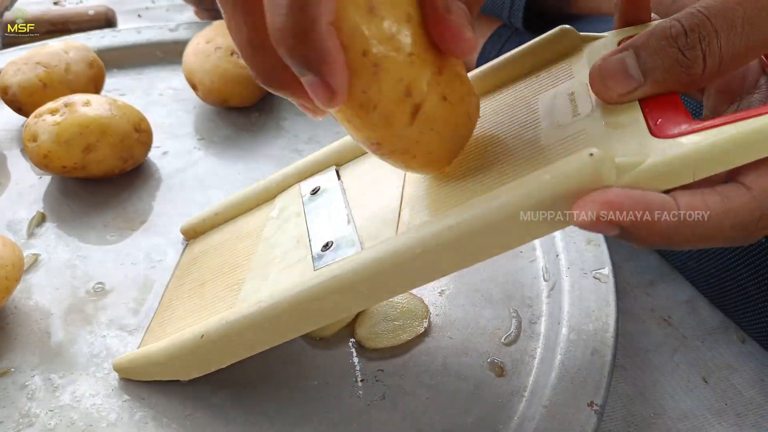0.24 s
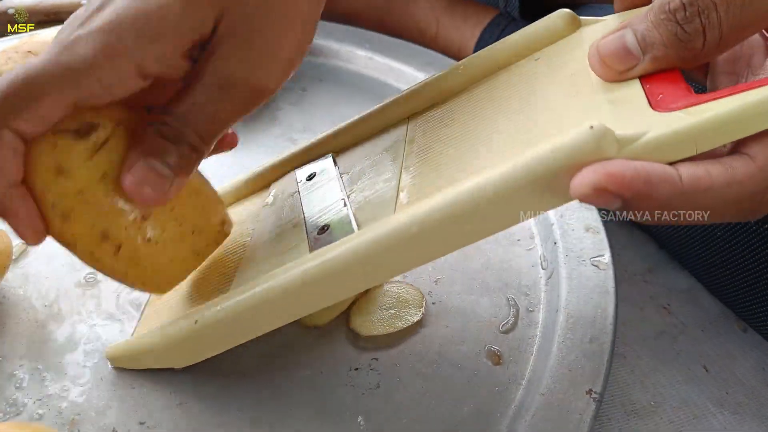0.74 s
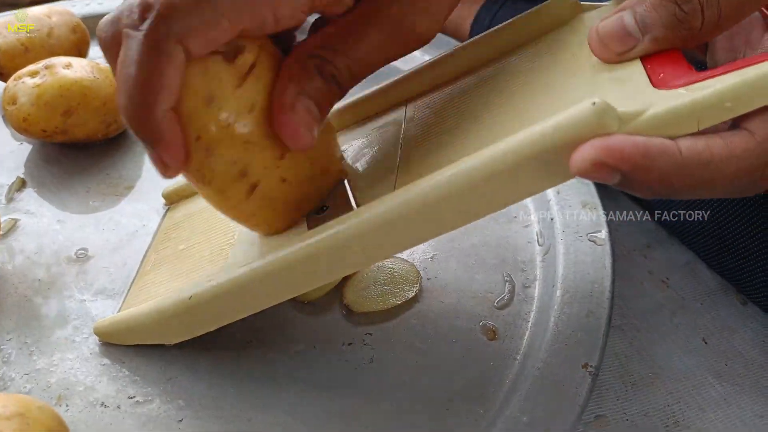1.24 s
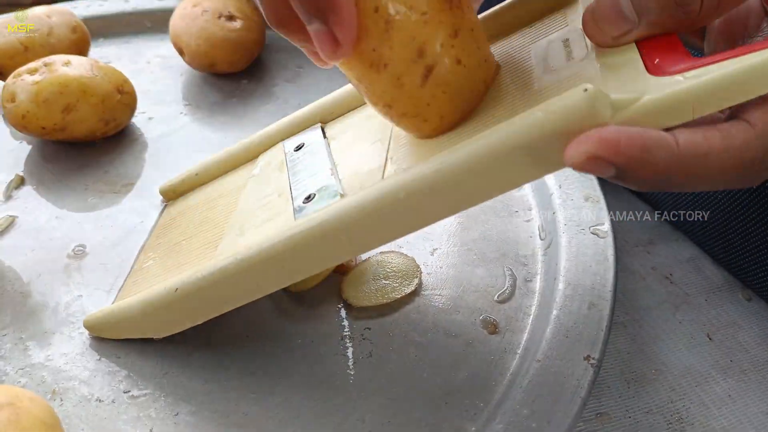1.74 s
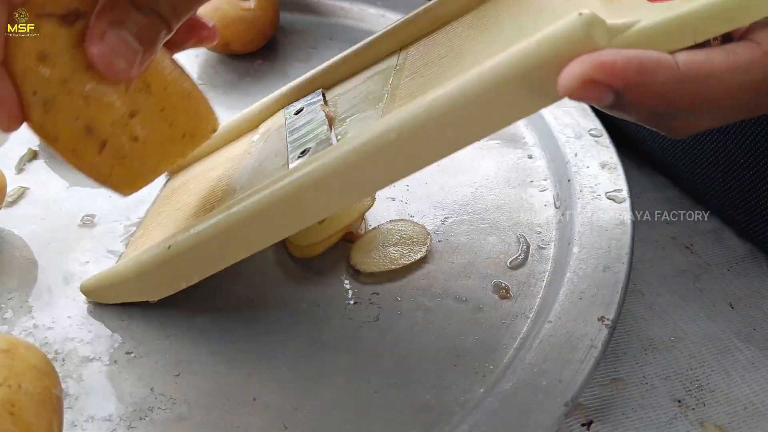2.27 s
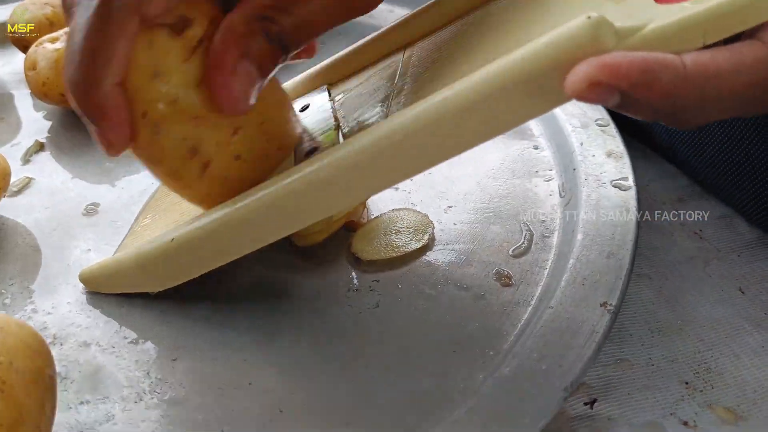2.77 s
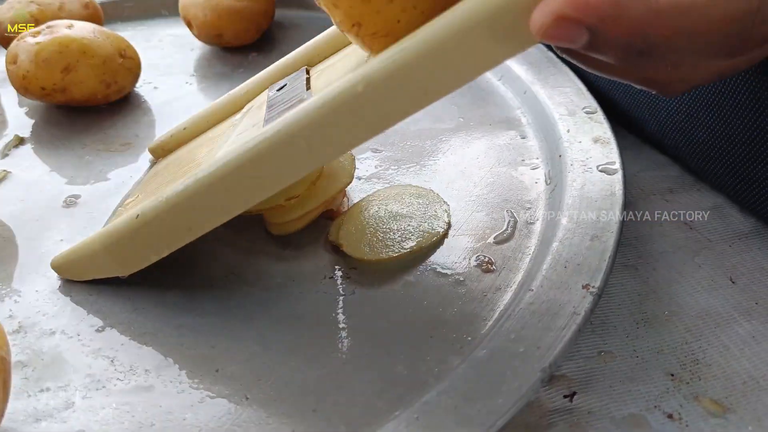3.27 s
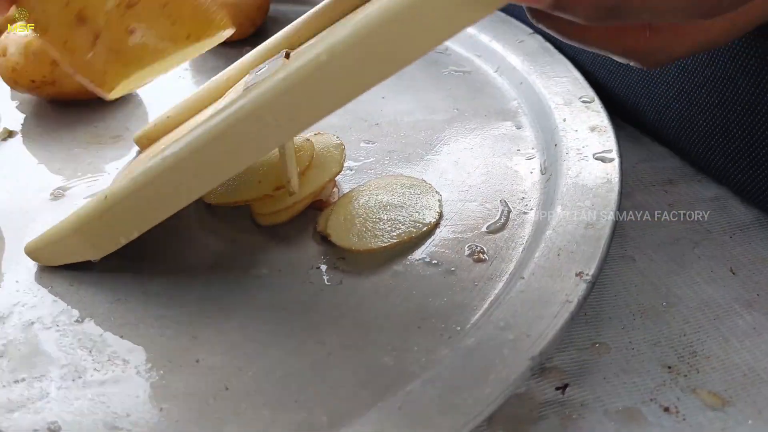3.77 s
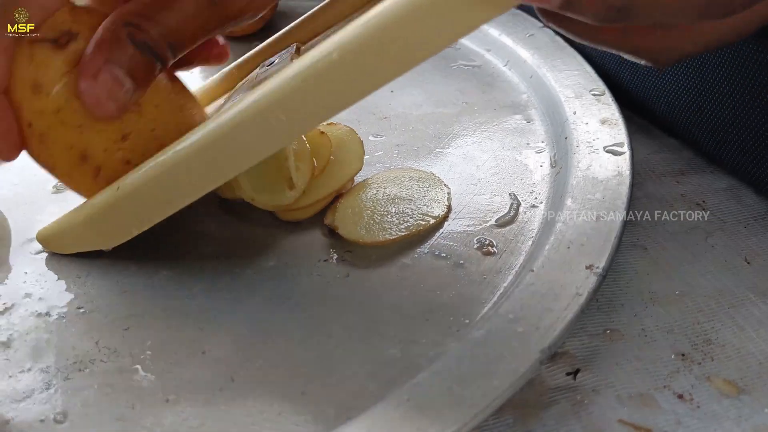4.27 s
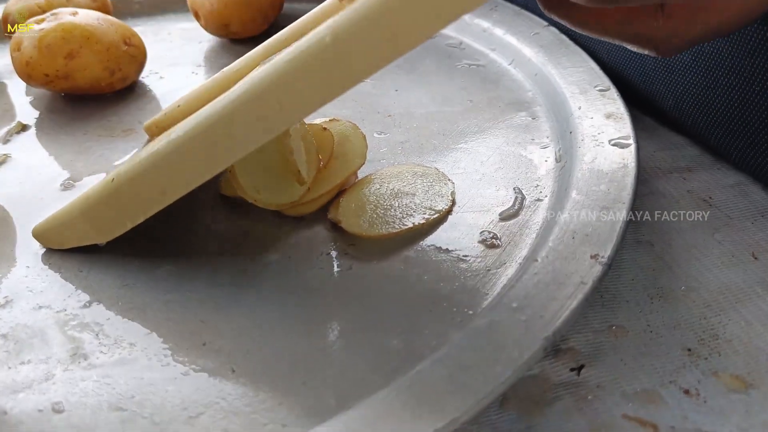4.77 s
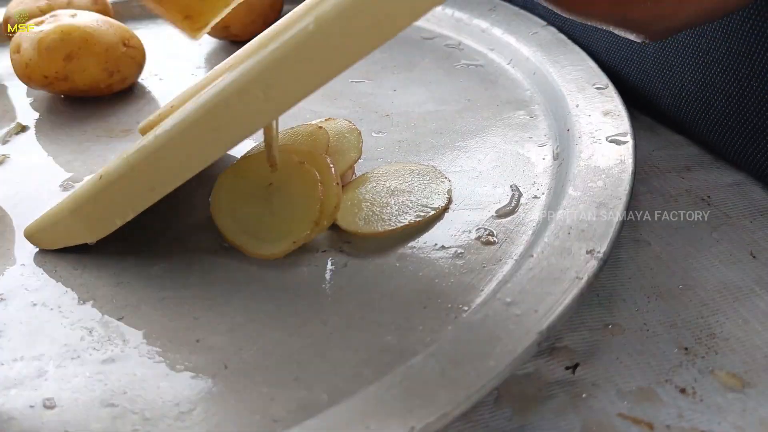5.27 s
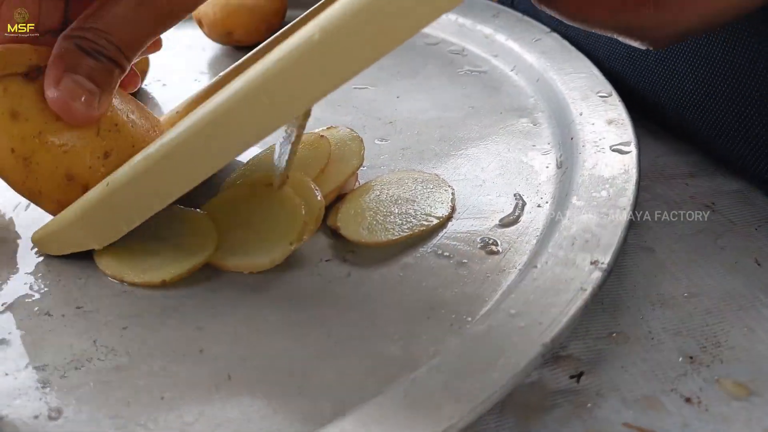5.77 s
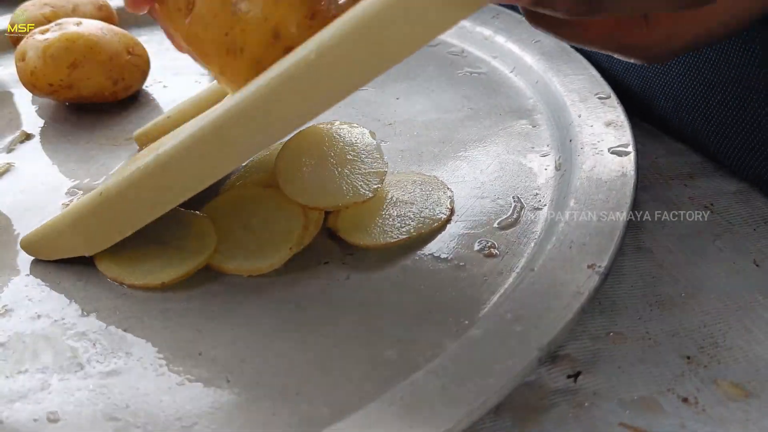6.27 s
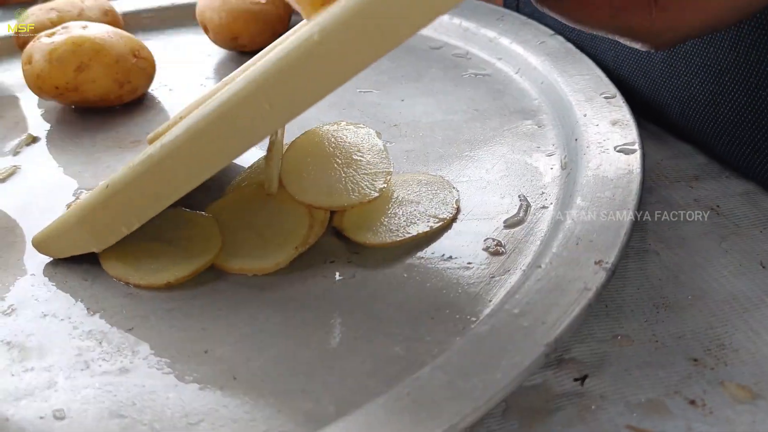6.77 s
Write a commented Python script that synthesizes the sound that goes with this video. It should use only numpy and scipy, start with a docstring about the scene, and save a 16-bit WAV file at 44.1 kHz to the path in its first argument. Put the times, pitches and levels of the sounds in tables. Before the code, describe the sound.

A close stereo view of potato slicing in a small, fairly dry kitchen, over quiet low rumble and soft hiss. A short scuff and light clack start at 0 s, with smaller drags following. Nine strokes bite the blade at about 0.6, 1.3, 2.1, 2.8, 3.5, 4.3, 5.0, 5.7 and 6.4 s. Each speeds up with a wet rubbing swish, knocks the blade, rips through in a crisp, juicy rasp of roughly 0.1 s, and ends with a small flick. Hollow plastic clacks fall between, notably sharp near 2.1 and 2.3 s, and busier from 4.1 to 5.2 s. Soft dull bumps mark returns to the top. A low draught flutters on the left around 1.5-1.9, 2.7-2.9, 5.0-5.4 s and intermittently from 5.9 s. Very faint squeaks and metallic tray ringing lie underneath; the last bumps are weak near 7 s.

```python
"""Kitchen hiss and a short scuff open the scene, then a raw potato is pushed nine times down a plastic mandoline.
Each stroke rubs over the wet ramp (stick-slip noise), bumps the blade, rasps through it (bursting cells)
and clacks off the end (noise pushes that ring the damped modes of the frame).
A draught, made of low turbulent noise, buffets the left microphone port.
The metal tray under the mandoline rings faintly, and a small room adds scattered echoes."""
import sys
import numpy as np
from scipy import signal
from scipy.fft import rfft, irfft, next_fast_len
from scipy.io import wavfile
from scipy.ndimage import uniform_filter1d, map_coordinates

SR = 44100
rng = np.random.default_rng(int(sys.argv[2]) if len(sys.argv) > 2 else 0)


def put_to_file(sound):
    """Save the sound as 16-bit audio at rate SR, in the file named by the first command-line argument."""
    columns = np.atleast_2d(sound).T  # one column per channel
    safe = np.clip(columns, -1, 1)
    whole_steps = np.round(safe * 32767)
    wavfile.write(sys.argv[1], SR, whole_steps.astype(np.int16))


N = 309582
TIME = np.arange(N) / SR


def amp(db):
    """Logarithmic level: decibels to gain."""
    return 10 ** (np.asarray(db) / 20)


def unit(x):
    """Power normalisation: scales to an rms of one."""
    return x / np.sqrt(np.mean(x ** 2) + 1e-20)


def read(points, hz):
    """Interpolates a curve over a log-frequency axis."""
    f, value = np.transpose(points)
    return np.interp(np.log(hz + 1), np.log(f + 1), value)


def level(rows, axis):
    """Envelope: one dB column of a time table as a gain for every sample."""
    rows = np.asarray(rows)
    return amp(np.interp(TIME, rows[:, 0], rows[:, axis]))


def add(mix, s, sound):
    """Superposition: mixes a sound in at time s, cut where the mix ends."""
    part = mix[:, round(s * SR):][:, :sound.shape[1]]
    part += sound[:, :part.shape[1]]


def convolve(x, response):
    """Linear filtering of each channel by an impulse response, keeping its length."""
    method = signal.oaconvolve if x.shape[1] == N else signal.fftconvolve
    return method(x, np.atleast_2d(response), axes=1)[:, :x.shape[1]]


def colour(x, spectrum, size=4096):
    """Minimum-phase filter: the Hilbert transform of the log gain supplies a causal phase."""
    hz = abs(np.fft.fftfreq(size, 1 / SR))
    log_gain = np.log(amp(np.maximum(read(spectrum, hz), -100)))
    response = np.fft.ifft(np.exp(np.conj(signal.hilbert(log_gain)))).real
    return convolve(x, response[:size // 2])


def band(low_hz, high_hz):
    """Causal Butterworth band-pass, as second-order sections."""
    return signal.butter(3, [low_hz, high_hz], "band", fs=SR, output="sos")


# Likeness of the two microphone ports: pitch_hz, likeness (0-1, negatives read as 0)
LIKENESS = [(610, 1), (900, 0.27), (1600, 0.78), (3000, 0), (8500, 0), (15000, -0.2)]
# Delay of the right port behind the left: pitch_hz, delay_s
LEAD = [(100, 0), (400, .00008), (700, .00005), (900, .00012), (1100, .00009), (1250, .00034),
        (1800, .00028), (2300, .00036), (3000, .00034), (4500, .000385)]
# Level difference of the ports: pitch_hz, left_minus_right_db
PAN = [(150, -1), (400, 4), (700, 1), (1200, 2.5), (2500, 0), (5000, -2.5), (9000, 3.5), (14000, -1)]


def ports(pair):
    """Interaural coherence: two unrelated signals become alike in the bass, shifted and unlike higher up."""
    size = next_fast_len(pair.shape[1])
    a, b = rfft(pair, size)
    hz = np.fft.rfftfreq(size, 1 / SR)
    same = np.clip(read(LIKENESS, hz), 0, 1)
    lean = amp(read(PAN, hz) / 2)
    delay = np.exp(-2j * np.pi * hz * read(LEAD, hz))
    right = (same * a + np.sqrt(1 - same ** 2) * b) * delay
    return irfft(np.array([a * lean, right / lean]), size)[:, :pair.shape[1]]


def ring(modes, seconds, stretch=1):
    """Modal synthesis: the impulse response is a sum of exponentially damped cosines."""
    t = np.arange(int(seconds * SR), dtype=np.float32) / SR
    response = 0
    for hz, db, t60 in modes:
        decay = np.exp(-float(np.log(1000) / t60) * t)
        response = response + float(amp(db)) * decay * np.cos(float(2 * np.pi * hz * stretch) * t)
    return response


# Modes of the plastic frame and its blade: pitch_hz (before the grip factor), level_db (relative), t60_s
FRAME = [(166, 2, 0.047), (248.7, -3, 0.044), (679, -25.5, 0.018), (405, 0.5, 0.081), (452.5, 6.5, 0.042),
         (532.8, -1, 0.098), (895.5, -1.5, 0.067), (1005, 3, 0.032), (1317, 3, 0.039), (1513, 3.5, 0.058),
         (2054, -4.5, 0.11), (2600, 2.5, 0.016), (3860, -3, 0.074), (5450, -17.5, 0.028),
         (7280, 6.5, 0.022), (7200, 10, 0.022), (8060, 10.5, 0.023), (11400, -11.5, .015)]


def frame(x, ring_db, grip=1):
    """Modal excitation: a force is heard directly and through the frame modes; grip scales their pitch."""
    return x + amp(ring_db) * convolve(x, ring(FRAME, .1, grip))


def wobble(rate_hz):
    """Random modulation: interpolated Gaussian knots, two per rate period, with an rms of one."""
    knots = np.arange(0, TIME[-1] + 1, .5 / rate_hz)
    return unit(np.interp(TIME, knots, rng.standard_normal(len(knots))))


def crackle(per_s, spread_db, clump_db, clump_hz):
    """Random impulse process: single-sample impulses of uneven size whose strength swells in clumps."""
    uneven = spread_db * np.minimum(rng.exponential(1, N), 4)
    size = amp(uneven + clump_db * wobble(clump_hz))
    struck = rng.random(N) < per_s / SR
    return ports(rng.standard_normal((2, N)) * size * struck)


def whistle(hz, width_hz):
    """Heterodyning: complex low-pass noise is shifted up to the pitch curve hz as a narrow band."""
    lowpass = signal.butter(2, width_hz / 2, fs=SR, output="sos")
    a, b = signal.sosfilt(lowpass, rng.standard_normal((2, 2, len(hz))))
    carrier = np.exp(2j * np.pi * np.cumsum(hz) / SR)
    return unit(((a + 1j * b) * carrier).real)


# Spectrum of the steady rumble and hiss: pitch_hz, level_db (relative)
HISS = [(15, -33), (28, -10.5), (60, -1.5), (100, 0), (150, 1.5), (215, -14), (450, -20.5), (800, -26.5),
        (1350, -26), (2100, -29.5), (4000, -31), (5500, -37), (7500, -45), (9000, -48.5), (15800, -43)]
# Lean of the hiss, on top of the port differences: pitch_hz, left_minus_right_db
HISS_PAN = [(60, 1), (300, 1), (1500, -6), (2500, -6), (6000, -12.5), (9000, -9), (14000, -4.5)]


def hiss(level_db=-55.5):
    """Stationary filtered noise: the steady rumble and hiss of the kitchen."""
    air = rfft(colour(ports(rng.standard_normal((2, N))), HISS))
    lean = amp(read(HISS_PAN, np.fft.rfftfreq(N, 1 / SR)) / 2)
    return amp(level_db) * unit(irfft(air * np.array([lean, 1 / lean]), N))


# Thin hiss that wanders in pitch: time_s, pitch_hz, level_db (before the pan)
THIN_HISS = [(0, 7200, -57), (.35, 6100, -77.5), (.95, 5950, -79), (1.251, 6400, -69), (1.751, 6490, -67.5),
             (2.502, 6800, -74), (3.3, 7200, -71), (4.702, 7330, -77.5), (7.02, 7200, -85)]
# Faint squeaks: start_s, length_s, pitch_hz, level_db (before the swell)
SQUEAKS = [(1.478, 0.41, 1002, -70.5), (1.666, 0.11, 5650, -68), (3.166, 0.14, 2780, -72),
           (3.865, 0.21, 1400, -68.5), (3.923, .12, 1780, -66.5), (4.875, 0.1, 4200, -65.5),
           (4.885, 0.078, 4760, -74), (4.892, 0.098, 1040, -64), (6.68, 0.13, 5570, -78),
           (6.754, 0.075, 4250, -77)]


def faint_sounds(pan_db=-2):
    """Narrow-band noise: a thin wandering hiss, stronger on the right, and a few soft squeaks."""
    s, hz, _ = np.transpose(THIN_HISS)
    thin = whistle(np.interp(TIME, s, hz), width_hz=780)
    out = thin * level(THIN_HISS, axis=2) * amp([[pan_db], [-pan_db]])
    for s, length, hz, db in SQUEAKS:
        swell = np.hanning(int(length * SR))
        tone = whistle(np.full(len(swell), hz), width_hz=0.012 * hz)
        add(out, s, amp(db) * unit(swell) * swell * tone)
    return out


def glide(rise_db_per_s, hold_s, fall_db_per_s, back_db, uneven_db=3):
    """Speed-dependent friction: it grows as the potato speeds to the blade, holds, dies as the hand slows."""
    loudest = back_db + uneven_db * wobble(10)
    for start, length, *_, before_db, after_db in STROKES:
        ahead = np.maximum(start - TIME, 0)
        past = np.maximum(TIME - start - length, 0)
        db = np.interp(TIME, [start, start + length], [before_db, after_db])
        db -= rise_db_per_s * ahead + fall_db_per_s * np.maximum(past - hold_s, 0)
        loudest = np.maximum(loudest, db)
    return amp(loudest)


# Spectra of the wet swish and of the rub: pitch_hz, level_db (relative)
SWISH = [(1500, -25.5), (2800, -4.5), (4500, 0), (7300, 1), (9000, -10), (12000, -5), (16000, -9.5)]
RUB = [(150, -29.5), (400, 0), (700, -1), (1400, 7.5), (2400, -1.5), (4000, -26.5)]
# Course of each sliding sound: rise_db_per_s, hold_s (after the cut), fall_db_per_s, back_db (before trim)
SWISH_SHAPE = (219.5, 0.0081, 240, -83)
RUB_SHAPE = (178.5, 0.1167, 174, -72.5)
# Brief drags on ramp or rail: start_s, length_s, rub_db, swish_db
SCUFFS = [(0, 0.054, -42, -48.5), (0.081, 0.094, -58.5, -66.5), (0.205, 0.079, -54, -68),
          (0.543, 0.032, -63, -58), (0.791, 0.079, -64, -66), (0.867, 0.019, -56, -82),
          (1.282, 0.048, -54.5, -64), (2.021, 0.034, -53, -59), (2.043, 0.057, -47, -54.5),
          (2.203, 0.096, -45, -67), (2.431, 0.017, -60, -66.5), (2.771, 0.033, -43, -58),
          (3.057, 0.064, -59.5, -65), (3.367, 0.041, -44.5, -57), (3.856, 0.18, -66, -76.5),
          (4.183, 0.017, -69, -65), (4.515, 0.042, -70, -56), (5.137, 0.076, -41, -59),
          (5.539, 0.056, -53.5, -82), (6.028, 0.027, -60, -68), (6.284, 0.03, -54.5, -80),
          (6.34, 0.059, -54, -76)]


def sliding(swish_db=-0.5, rub_db=-3.5, tick_db=-10):
    """Stick-slip friction: the wet cut face swishes, rubs and ticks on the ramp, and at times drags harder."""
    wet = crackle(per_s=1900, spread_db=-4.0, clump_db=4.0, clump_hz=60.8)
    swish = unit(colour(wet, SWISH))
    stick_slip = crackle(per_s=3000, spread_db=2, clump_db=1.8, clump_hz=45)
    ticks = crackle(per_s=64, spread_db=4.5, clump_db=5.5, clump_hz=17)
    force = unit(stick_slip) + amp(tick_db) * unit(ticks)
    rub = unit(colour(frame(force, ring_db=-41.0), RUB))
    out = amp(swish_db) * glide(*SWISH_SHAPE) * swish
    out += amp(rub_db) * glide(*RUB_SHAPE) * rub
    for s, length, low_db, high_db in SCUFFS:
        swell, first = np.hanning(int(length * SR)), round(s * SR)
        span = slice(first, first + len(swell))
        low = amp(low_db) * unit(swell * rub[:, span])
        high = amp(high_db) * unit(swell * swish[:, span])
        add(out, s, low + high)
    return out


# Spectrum of the buffeting at speed 1: pitch_hz, level_db (relative)
BUFFET = [(15, -26.5), (30, -10.5), (45, 5), (80, 8), (140, 0.5), (200, -11.5), (300, -34), (500, -46.5),
          (1200, -74)]


def eddies(size, speed):
    """Strouhal scaling: low turbulent noise of even strength, shifted up in pitch by faster air."""
    air = colour(rng.standard_normal((2, max(size, SR // 4))), [(hz * speed, db) for hz, db in BUFFET])
    lumps = np.sqrt(abs(uniform_filter1d(air ** 2, size=1300, axis=1)) + 1e-12)
    return unit((air / lumps)[:, -size:])


# Gusts: peak_s, length_s, level_db (before trim)
GUSTS = [(0.312, 0.041, -28), (1.185, 0.049, -27), (1.238, 0.097, -32.5), (1.435, 0.074, -30),
         (1.542, 0.058, -21), (1.575, 0.085, -19), (1.662, 0.042, -21.5), (1.746, 0.07, -22.5),
         (1.85, 0.066, -28.5), (1.918, 0.067, -20.5), (2.136, 0.034, -27), (2.331, 0.15, -33.5),
         (2.712, 0.065, -22), (2.785, 0.077, -24), (2.882, 0.049, -23), (5.031, 0.058, -30.5),
         (5.109, 0.045, -27), (5.163, 0.05, -25), (5.288, .12, -20), (5.359, 0.065, -16.5),
         (5.416, 0.11, -27), (5.939, 0.028, -26.5), (5.995, 0.081, -24.5), (6.066, 0.063, -27),
         (6.435, 0.076, -20), (6.8, 0.096, -26), (6.854, 0.044, -21.5), (7.015, 0.046, -23.5)]
# Light draught between the gusts: time_s, level_db (before trim)
BREEZE = [(0, -55.5), (1.1, -57.5), (1.2, -52), (1.8, -35), (2.0, -59), (2.6, -51), (2.75, -32),
          (3.0, -69.5), (4.95, -63), (5.25, -30.5), (5.65, -40.5), (5.85, -61), (6.05, -42.5), (6.7, -36.5),
          (7.02, -44)]


def draught(trim_db=-1, right_db=-23, breeze_speed=0.93, usual_db=-26, octaves_per_db=0.0542):
    """Turbulent pressure: eddies thump the left port, barely the right; a stronger gust is also brighter."""
    out = eddies(N, breeze_speed) * level(BREEZE, axis=1)
    for s, length, db in GUSTS:
        swell = np.hanning(int(length * SR))
        speed = 2 ** (octaves_per_db * (db - usual_db))
        add(out, s - length / 2, amp(db) * swell * eddies(len(swell), speed))
    return out * amp([[trim_db], [trim_db + right_db]])


# Soft bumps onto the ramp, mostly at the top of a stroke: start_s, level_db (before trims), hardness_db
BUMPS = [(0.428, -31.5, 7), (1.148, -33, -0.5), (1.889, -37, 2), (2.604, -36, -2), (2.773, -42, 3),
         (3.389, -34, -4), (4.834, -28.5, 2), (5.552, -35.5, -4.5), (5.578, -42, -9), (5.706, -33, 17),
         (5.83, -40, -11), (6.395, -30, 4), (6.934, -45.5, 0), (7.014, -42.5, -0.5)]
# Clacks on a rail or off the ramp's end: start_s, thud_db, hollow_db, clack_db, snap_db (before band trims)
CLACKS = [(0.025, -59, -38.5, -37.5, -51), (0.247, -73, -56, -36, -68), (0.753, -60, -39.5, -36.5, -43.5),
          (1.506, -52, -42, -41.5, -46.5), (2.092, -52, -42.5, -31, -23), (2.259, -60, -35.5, -19.5, -31.5),
          (2.3, -56, -31.5, -37, -44), (2.872, -62, -41.5, -28, -33), (2.969, -47, -31.5, -26, -30.5),
          (3.715, -68, -34, -29.5, -34), (3.746, -64, -45, -42.5, -46), (4.156, -38, -31.5, -23, -35),
          (4.426, -62, -55, -32.5, -43), (4.439, -50, -32.5, -25, -32.5), (4.476, -62, -37.5, -42.5, -36.5),
          (4.84, -29, -31, -27.5, -41), (5.019, -47, -33, -37, -38), (5.185, -38, -29, -36.5, -34.5),
          (5.212, -60, -57, -25, -37.5), (5.224, -66, -62, -49, -42.5), (5.302, -75, -69, -49.5, -49.5),
          (5.858, -50, -41, -33, -37), (5.886, -74, -67, -43.5, -45.5), (6.325, -42, -34.5, -37.5, -59),
          (6.577, -34, -29, -27, -30.5), (6.598, -45, -36.5, -39, -39)]


def contacts(bite_thud_db=-5.5, bite_hollow_db=-3, bite_snap_db=-3, flick_early_s=0.0081, flick_thud_db=-17,
             bump_thud_db=-5, bump_clack_db=-14, bump_snap_db=-21):
    """Contact mechanics: bites full, flicks light, bumps dull; (s, thud, hollow, clack, snap dB, decay s)."""
    bite_s, flick_s, bump_s, clack_s = 0.0051, 0.0015, .0037, 0.0032  # decay times of the push
    rows = []
    for s, length, bite, _, _, flick, snap, _, _ in STROKES:
        rows.append((s, bite + bite_thud_db, bite + bite_hollow_db, bite, bite + bite_snap_db, bite_s))
        rows.append((s + length - flick_early_s, flick + flick_thud_db, flick, flick, snap, flick_s))
    for s, db, hard in BUMPS:
        clack, snap = db + bump_clack_db + hard, db + bump_snap_db + hard
        rows.append((s, db + bump_thud_db, db, clack, snap, bump_s))
    return rows + [(*row, clack_s) for row in CLACKS]


# Bands thud, hollow, clack, snap, top: low_hz, high_hz, trim_db, rise_s, scuff_db (re push), scuff_decay_s
KNOCK_BANDS = [(125, 393, -1, 0.0028, -20.5, .012), (352, 715, -0.5, 0.0016, -19.5, 0.0091),
               (870, 3210, 0, 0.0022, -16, 0.013), (2640, 9350, -0.5, 0.0015, -26.5, 0.025),
               (8150, 16300, -3.5, 0.0014, -25.5, .006)]
# Spectrum of the gritty push: pitch_hz, level_db (relative)
BLOW = [(100, 3.5), (1500, 1.5), (2500, -4), (3300, -10.5), (5000, -7), (7300, -5.5), (9000, -12.5),
        (12000, -11.5), (16000, -16.5)]


def knocks(ring_db=-42, late_s=.0003, dulling=0.35, grip=0.97, grip_spread=.012):
    """Impact excitation: the soft potato presses on ramp, blade or rail; push and scuff ring the frame."""
    out, t = np.zeros((2, N)), np.arange(-500, 3500) / SR
    after = np.maximum(t, 0)
    grit = colour(ports(rng.standard_normal((2, next_fast_len(N + len(t))))), BLOW)
    filters = [band(low, high) for low, high, *_ in KNOCK_BANDS]
    for s, *band_db, contact in contacts():
        force = grit[:, round(s * SR):][:, :len(t)]
        # the hand's grip shifts the pitch
        body = amp(ring_db) * ring(FRAME, t[-1], grip + grip_spread * rng.standard_normal())
        body[0] += 1  # the direct sound
        clack_db, snap_db = band_db[-2:]
        # a soft contact loses its top first
        top_db = snap_db + dulling * min(snap_db - clack_db, 0)
        for row, sections, db in zip(KNOCK_BANDS, filters, band_db + [top_db]):
            _, _, trim, rise, scuff_db, scuff_s = row
            touch = 1 + np.tanh(t / rise)
            push = touch * (np.exp(-after / contact) + amp(scuff_db) * np.exp(-after / scuff_s))
            blow = signal.sosfilt(sections, convolve(force * push, body))
            # the level stands for the blow's energy spread over 20 ms
            add(out, s + t[0] + late_s, amp(db + trim) * unit(blow) * np.sqrt(.02 * SR / len(t)))
    return out


def reflections(x, count=6, reach_s=.005, echo=.27, travel=0.034):
    """Comb filtering: echoes off hand, potato and tray, whose paths lengthen as the potato travels."""
    n = np.arange(x.shape[1])
    out = x.copy()
    for late, sign in rng.uniform(0, 1, (count, 2)):
        delay = (late + 0.0992) * reach_s * SR * (1 + travel * n / len(n))
        delayed = np.array([map_coordinates(side, [n - delay], order=3) for side in x])
        out += echo * np.sign(sign - .5) * delayed
    return out


def peel(size, count=6, low_hz=1800, high_hz=8000, width_hz=110, sag=0.048):
    """Resonance of a growing strip: the slice flaps in a few narrow bands that sink as it lengthens."""
    pitches = low_hz * (high_hz / low_hz) ** rng.random(count)
    sinking = 1 - sag * np.linspace(0, 1, size)
    return unit(sum(whistle(hz * sinking, width_hz) for hz in pitches))


# Spectrum of the rasp: pitch_hz, level_db (relative)
RASP = [(350, -29), (600, -13.5), (789, -3), (1020, 0), (1840, 2.5), (2030, -1.5), (2390, 0), (3320, -4.5),
        (5140, 1), (5660, -4.5), (7140, 1), (8650, -7.5), (12000, -2.5), (15800, -8.5)]
# One row a stroke; levels are before trims and arches. Columns: blade_bites_s, cut_length_s, bite_db, rasp_db,
# frame_push_db, flick_db (slice comes free), skin_snap_db, slide_before_db, slide_after_db
STROKES = [(0.603, 0.087, -31, -32, -41.5, -36, -38, -50.5, -49),
           (1.341, 0.088, -32.5, -31.5, -40.5, -37.5, -43, -49.5, -54),
           (2.133, 0.078, -22.5, -30.5, -38, -50.5, -37, -46, -48.5),
           (2.801, 0.12, -26, -32.5, -42, -39.5, -35.5, -53.5, -45.5),
           (3.543, 0.12, -29.5, -31.5, -43, -51, -33.5, -50.5, -48.5),
           (4.267, 0.121, -26.5, -32, -45.5, -40, -33.5, -50.5, -46.5),
           (5.028, 0.114, -25.5, -30, -42, -39, -28, -49.5, -49.5),
           (5.717, 0.087, -25, -29.5, -34, -33, -35, -47, -51.5),
           (6.405, 0.13, -23, -31, -42.5, -41, -32.5, -49, -47.5)]


def slicing(rasp_db=-1.0, arch_db=3.5, push_db=-1, entry_db=11, entry_s=0.015, bite_s=0.0085,
            release_s=0.0045, grip_spread=.045):
    """Fracture noise: bursting cells rasp loudest at mid-cut; drag, hardest on entry, makes the frame grumble."""
    cells = crackle(per_s=12000, spread_db=1.0, clump_db=2.1, clump_hz=134.7)
    tugs = crackle(per_s=1500, spread_db=0.5, clump_db=3, clump_hz=49.2)
    out = np.zeros((2, N))
    for start, length, _, loud_db, drag_db, *_ in STROKES:
        span = slice(round((start - .02) * SR), round((start + length + .05) * SR))
        t = np.maximum(TIME[span] - start, 0)
        grip = 1 + grip_spread * rng.standard_normal()
        burst = colour(frame(cells[:, span], ring_db=-47.5, grip=grip), RASP)
        rasp = unit(unit(reflections(burst)) + amp(-8) * peel(len(t)))
        tugged = frame(tugs[:, span], ring_db=-42.5, grip=grip)
        drag = unit(signal.sosfilt(band(283, 563), tugged))
        cutting = np.minimum(t / bite_s, 1) * np.exp(-np.maximum(t - length, 0) / release_s)
        width = np.sin(np.pi * np.minimum(t / length, 1))  # the potato is widest halfway
        out[:, span] += cutting * amp(rasp_db + loud_db + arch_db * width) * rasp
        out[:, span] += cutting * amp(push_db + drag_db + entry_db * np.exp(-t / entry_s)) * drag
    return out


# Modes of the metal tray: pitch_hz, level_db (relative), t60_s
TRAY = [(1050, -18.5, 2.3), (1410, -25, 0.41), (1780, -8, 1.9), (2040, -11.5, 0.39), (3760, -10.5, 0.67)]


def tray(work, ring_db=-72):
    """Sympathetic resonance: the work on the mandoline faintly rings the modes of the tray under it."""
    return amp(ring_db) * convolve(work, ring(TRAY, 0.47))


# Reverberation time of the room: pitch_hz, t60_s
KITCHEN = [(200, 0.15), (1000, 0.28), (4000, 0.67), (14000, 1)]


def kitchen(x, room_db=-26):
    """Diffuse reverberation: decaying noise stands for scattered echoes, with its own t60 at each pitch."""
    hz, t, z = signal.stft(rng.standard_normal((2, SR // 2)), SR, nperseg=256)
    decay = amp(-60 * t / read(KITCHEN, hz)[:, None]) * (t > .004)
    tail = signal.istft(z * decay, SR, nperseg=256)[1]
    return amp(room_db) * convolve(x, tail / np.linalg.norm(tail[0]))


def scene():
    """Superposition: the mandoline, the tray under it, the room and the air."""
    work = knocks() + slicing() + sliding()
    return work + tray(work) + kitchen(work) + draught() + hiss() + faint_sounds()


def record(dry, edge_hz=16000):
    """Band limiting: a linear-phase low-pass removes the highest treble."""
    lowpass = signal.firwin(511, edge_hz, window=("kaiser", 9), fs=SR)
    return signal.oaconvolve(dry, lowpass[None], "same")


dry = scene()
out = record(dry)
put_to_file(out)
```